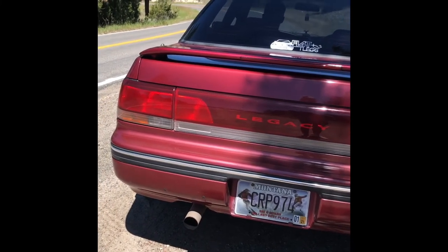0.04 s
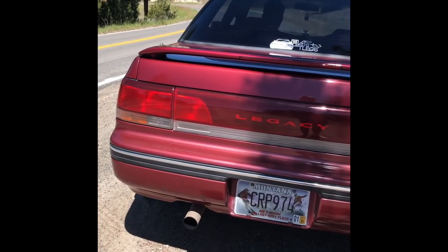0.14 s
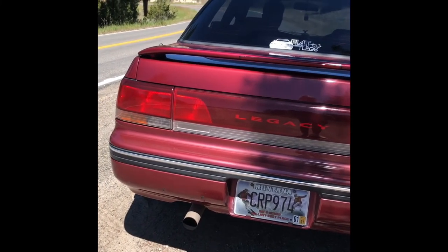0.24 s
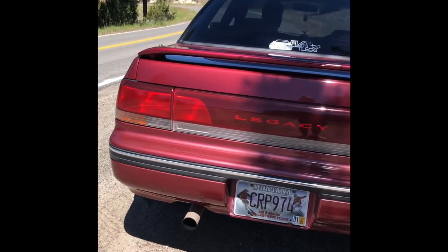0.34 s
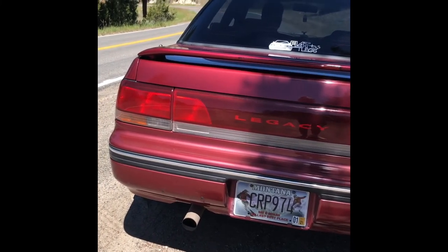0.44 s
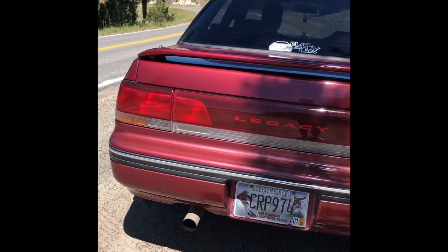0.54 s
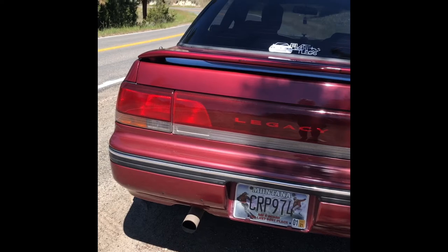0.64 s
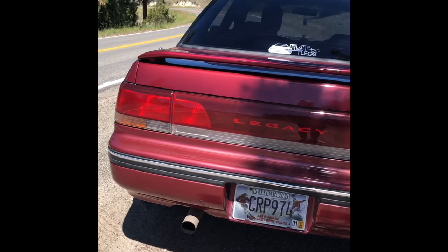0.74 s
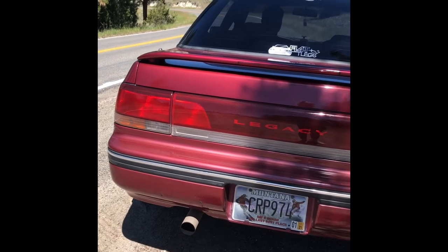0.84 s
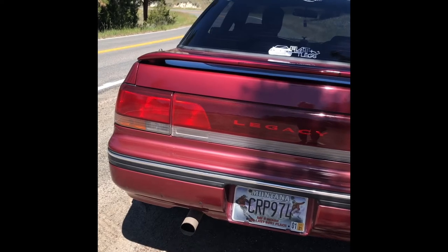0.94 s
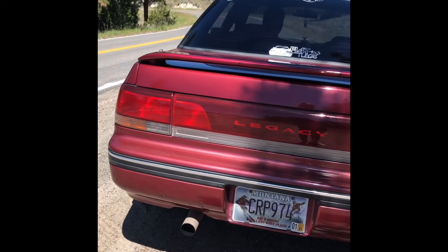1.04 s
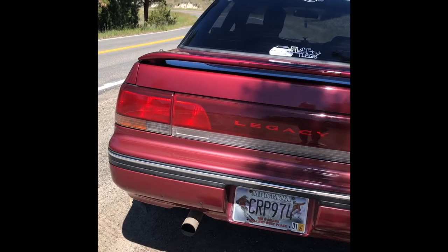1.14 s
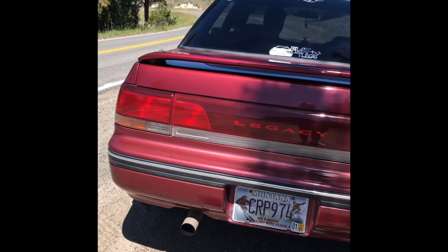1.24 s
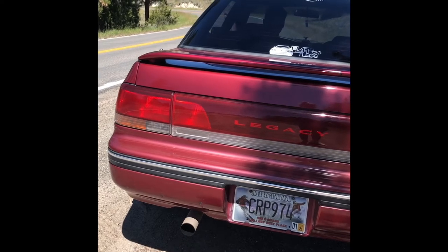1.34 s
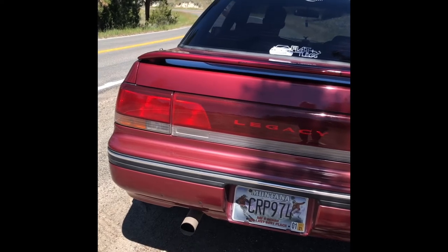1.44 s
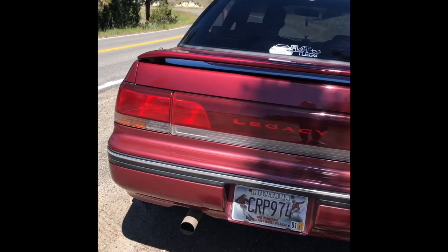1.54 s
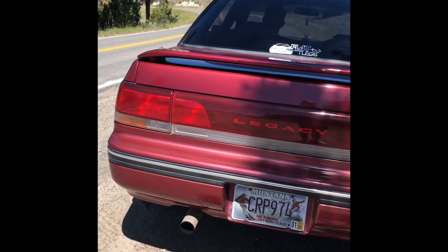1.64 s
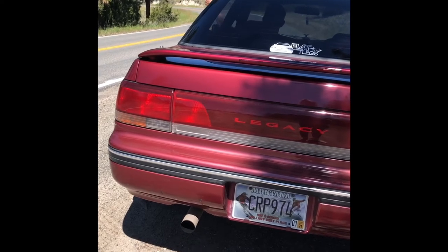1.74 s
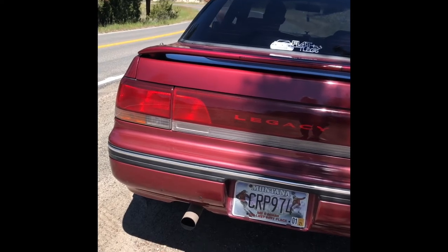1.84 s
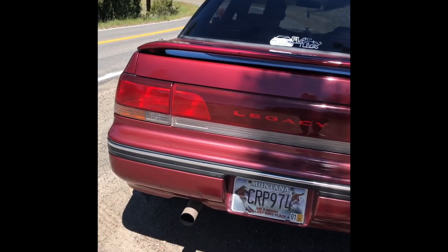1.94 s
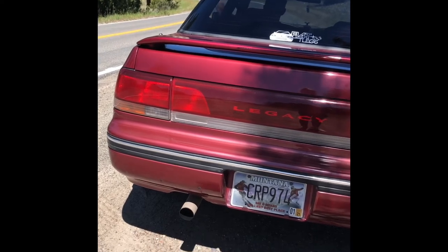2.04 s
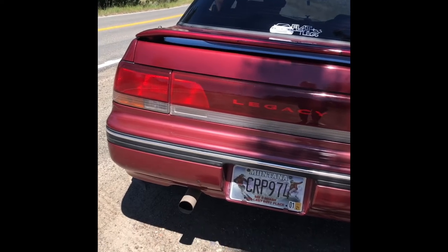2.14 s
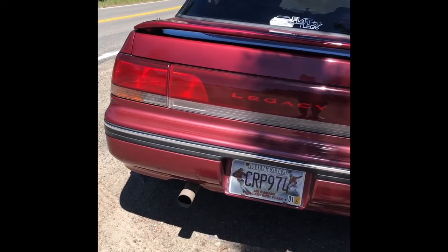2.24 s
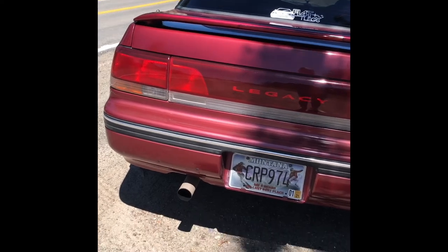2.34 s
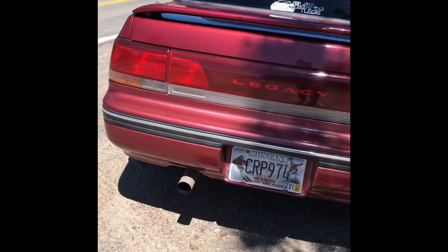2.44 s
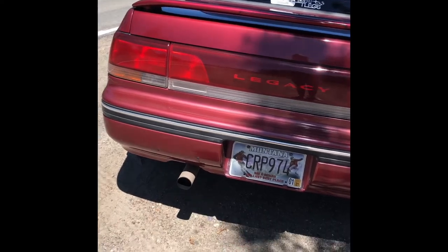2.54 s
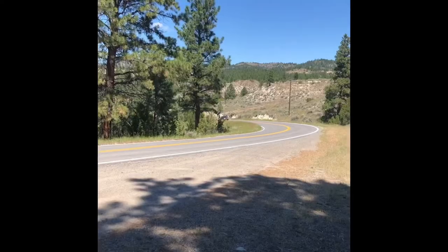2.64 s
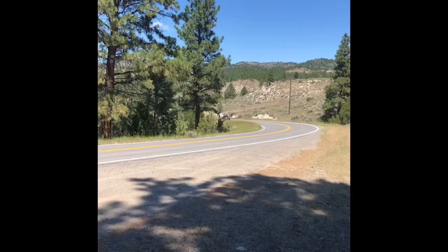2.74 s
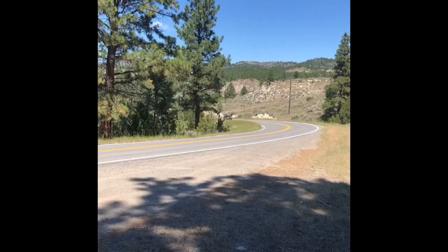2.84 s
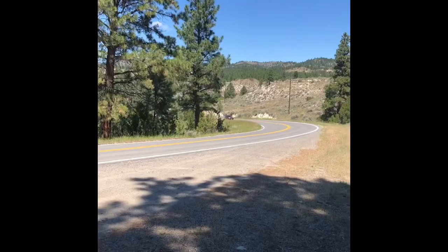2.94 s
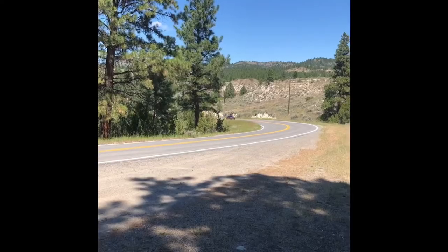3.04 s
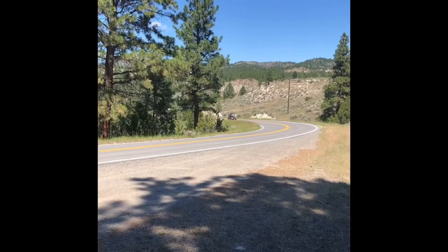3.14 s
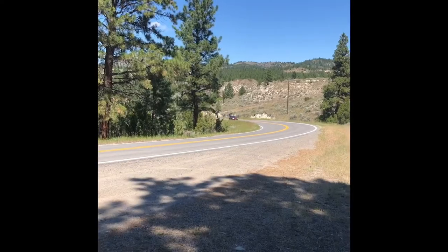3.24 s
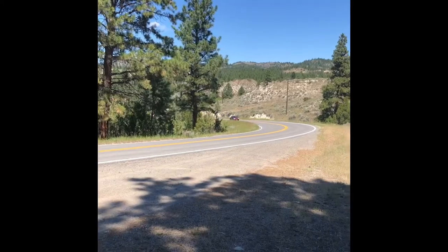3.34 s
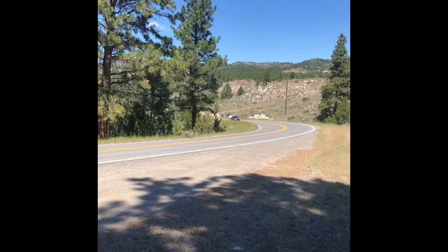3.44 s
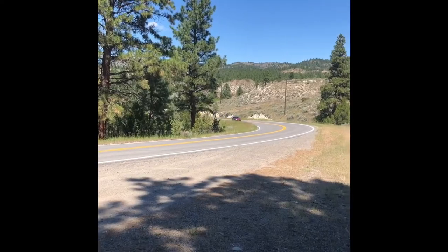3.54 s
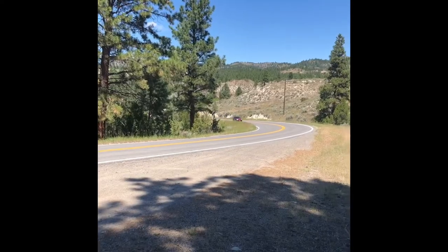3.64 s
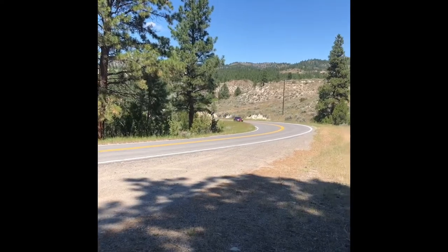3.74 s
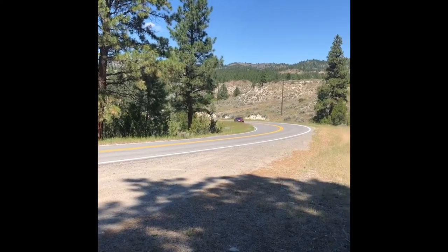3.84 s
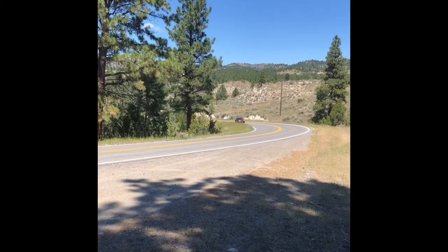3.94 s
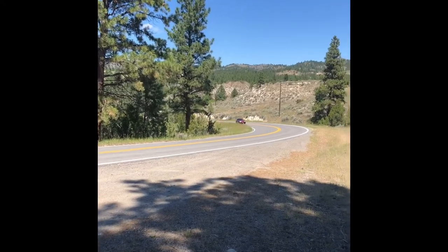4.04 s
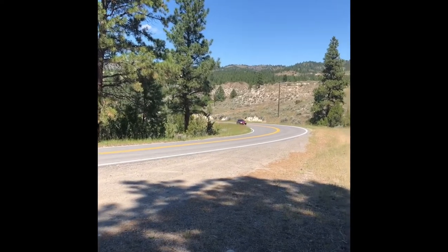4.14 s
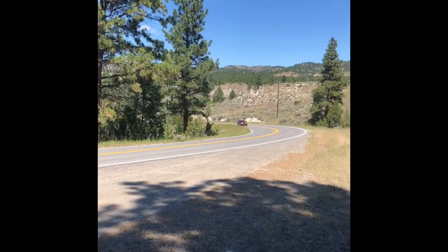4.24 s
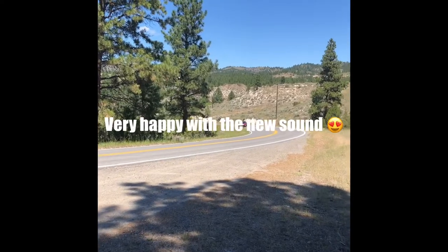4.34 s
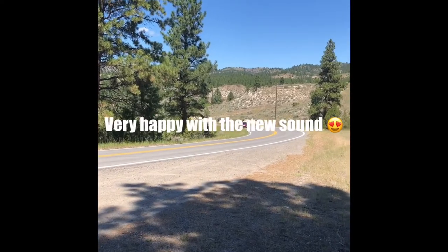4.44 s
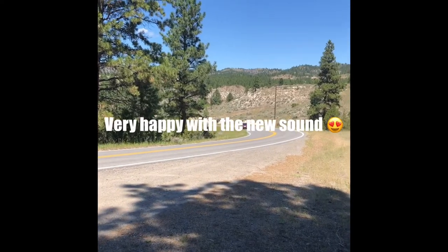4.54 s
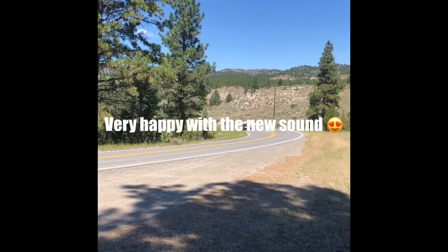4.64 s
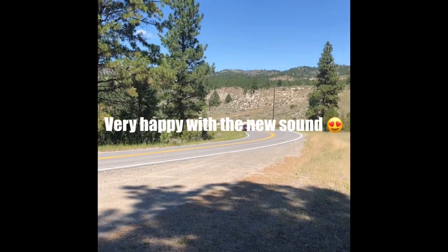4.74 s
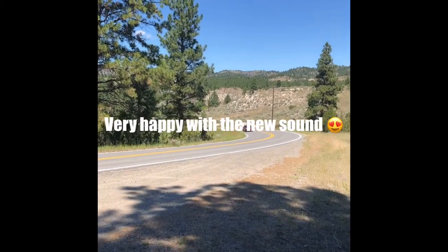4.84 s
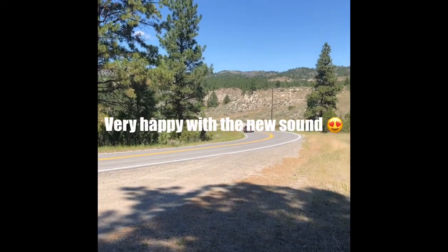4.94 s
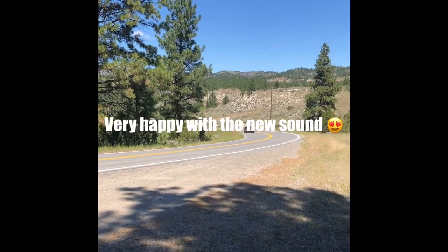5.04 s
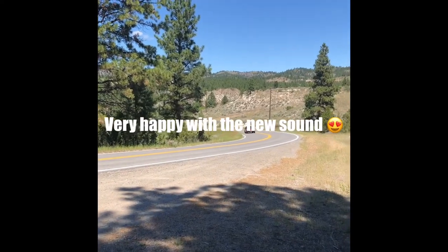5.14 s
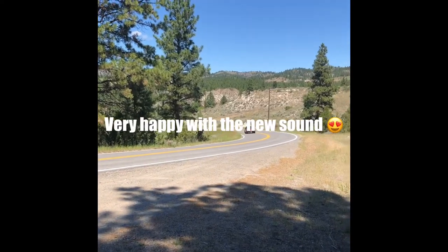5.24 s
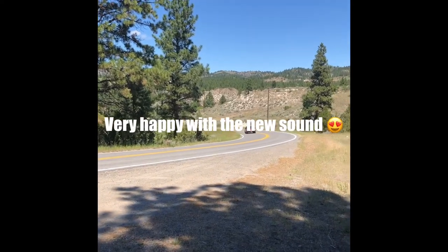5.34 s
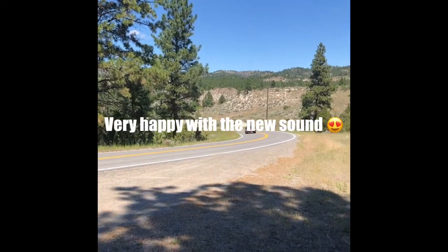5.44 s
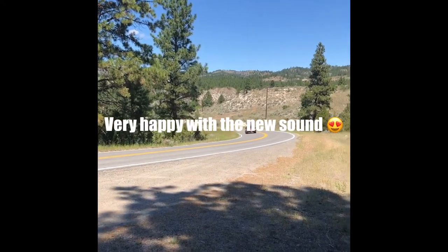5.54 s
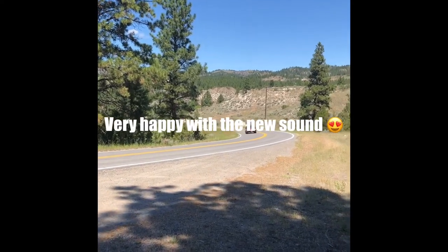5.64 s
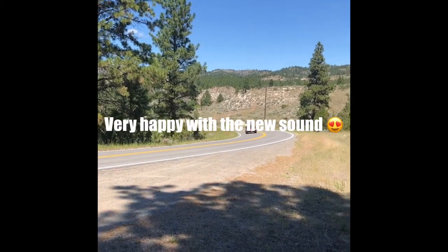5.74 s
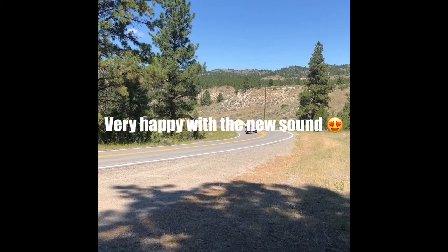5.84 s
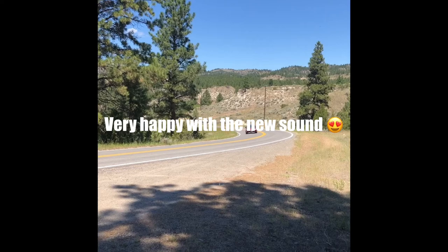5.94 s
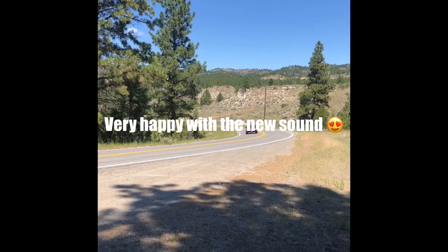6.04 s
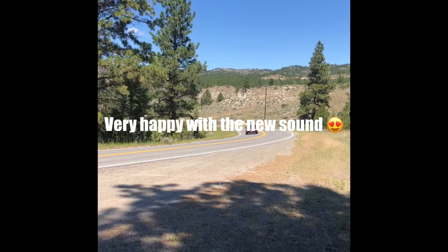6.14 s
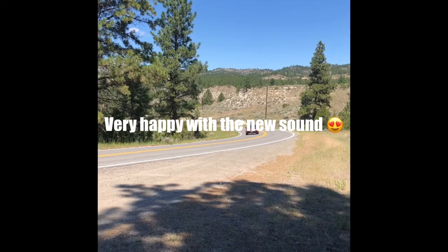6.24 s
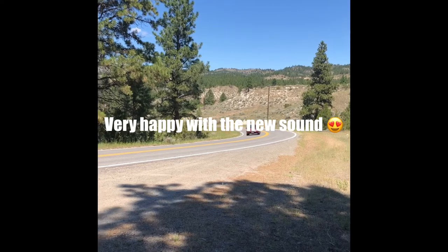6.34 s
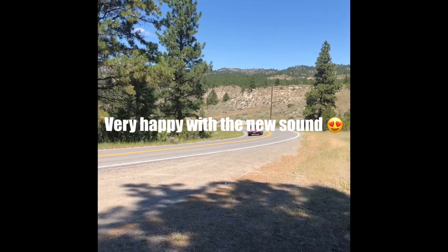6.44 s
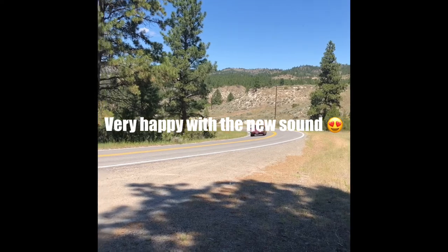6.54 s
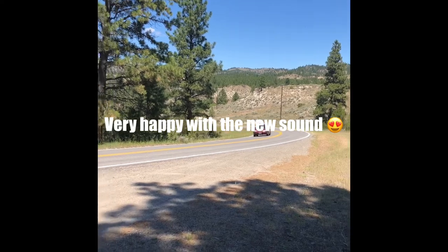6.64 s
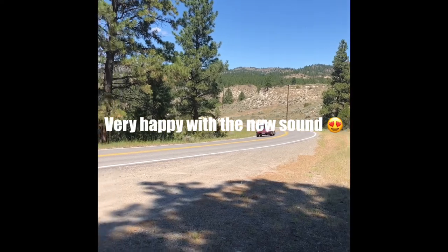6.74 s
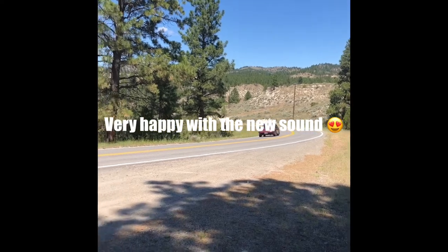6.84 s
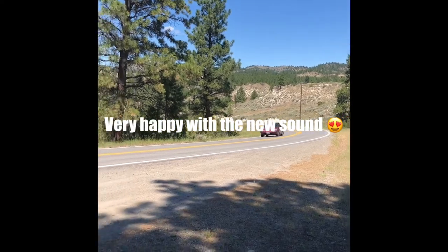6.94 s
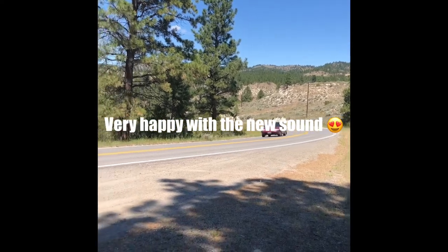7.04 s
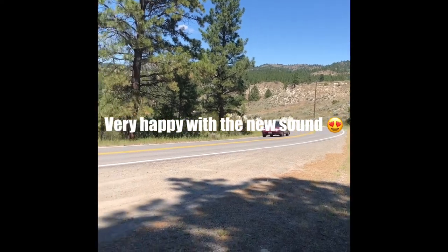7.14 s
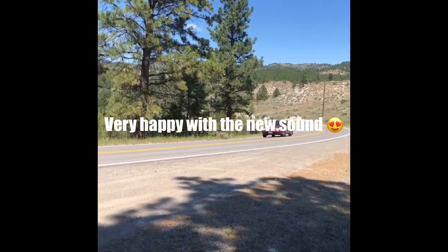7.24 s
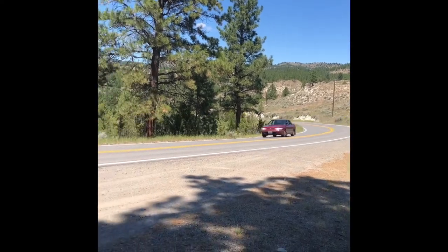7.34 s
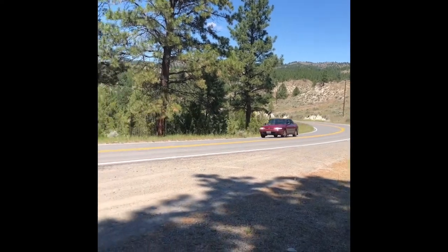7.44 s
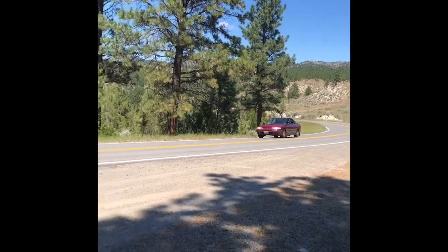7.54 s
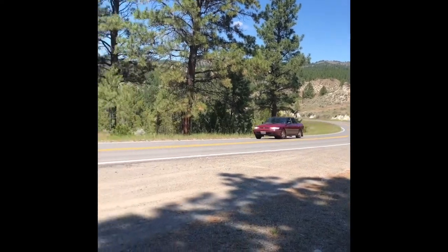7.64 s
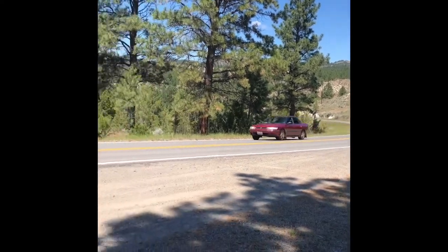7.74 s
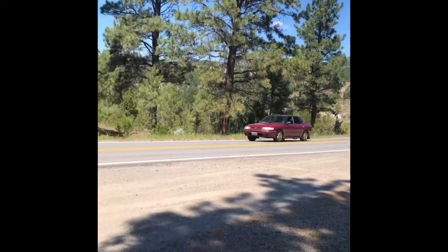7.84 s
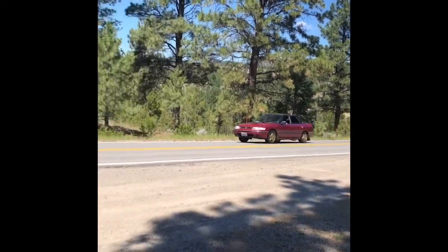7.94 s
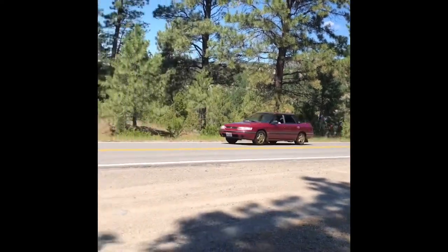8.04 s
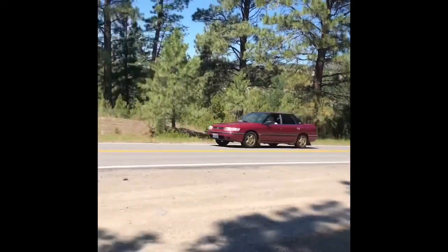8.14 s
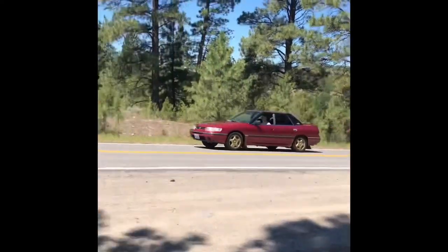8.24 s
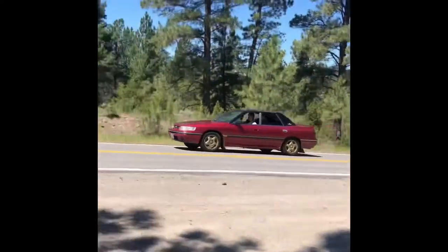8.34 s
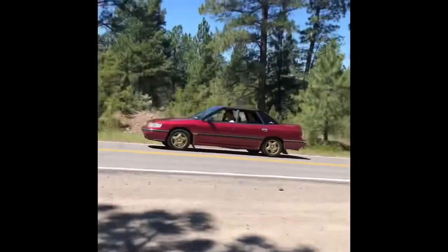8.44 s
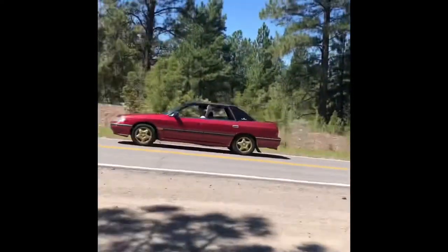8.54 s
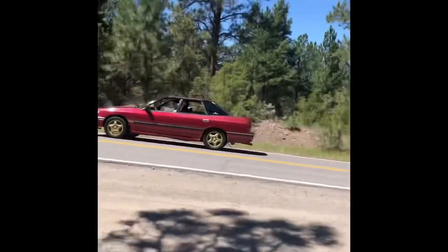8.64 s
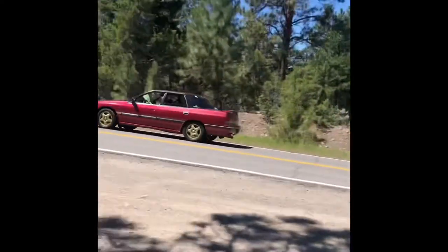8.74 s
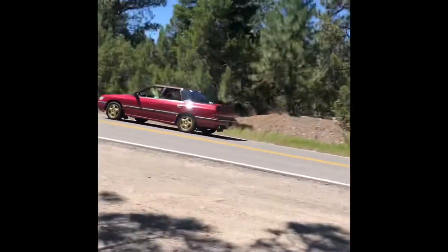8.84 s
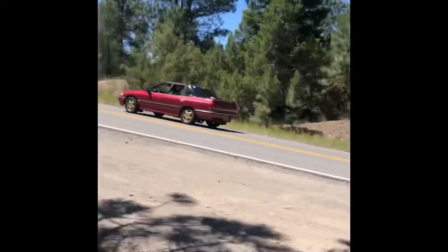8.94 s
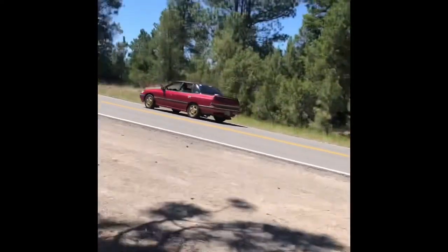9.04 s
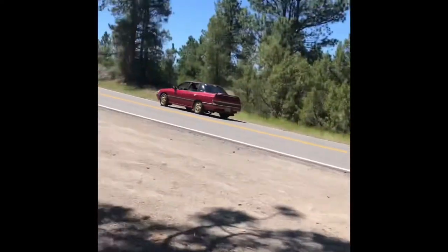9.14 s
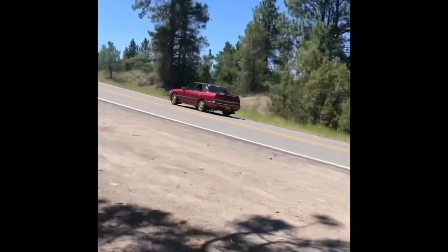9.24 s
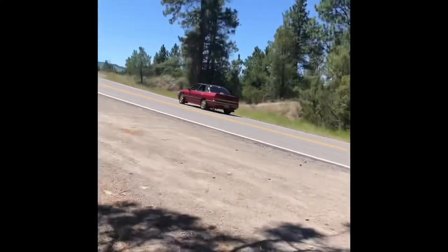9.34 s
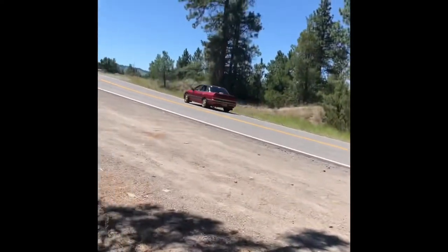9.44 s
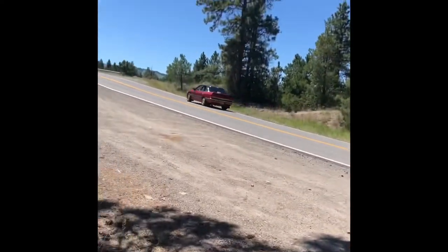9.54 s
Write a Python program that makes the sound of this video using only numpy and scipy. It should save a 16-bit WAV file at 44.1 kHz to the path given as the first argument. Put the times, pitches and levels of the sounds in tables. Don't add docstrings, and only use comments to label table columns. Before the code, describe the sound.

Close behind a tailpipe, a rumbling uneven engine sags, bangs sharply and revs; then a cut to a quiet road where the car approaches and passes.

```python
import sys
import numpy as np
from scipy import signal
from scipy.fft import rfft, irfft, next_fast_len
from scipy.io import wavfile
from scipy.ndimage import uniform_filter1d

SR = 44100
rng = np.random.default_rng(int(sys.argv[2]) if len(sys.argv) > 2 else 0)


def generate_wav(sig):
    pcm = np.round(np.clip(np.atleast_2d(sig).T, -1, 1) * 32767).astype(np.int16)
    wavfile.write(sys.argv[1], SR, pcm)


def amplitude_ratio(level_db):
    exponent = np.asarray(level_db, float) / 20
    return 10 ** exponent


N = 422919
TIME = np.arange(N) / SR
CUT_S, FADE_S = 2.53, 0.034

# (time [s], speed [cycles/s])
PARKED_SPEED = [(0, 32.8), (.63, 25), (.74, 25.4), (.86, 24.5), (1.355, 19.1), (1.46, 23.7), (1.74, 37.7),
                (1.79, 38.4), (2.0, 36.1), (2.53, 29.3)]
DRIVING_SPEED = [(2.56, 36.2), (3.69, 41.03), (3.85, 39.35), (4.03, 37.8), (4.16, 32), (4.3, 29.07),
                 (4.54, 29.13), (5.75, 31.75), (6.73, 33.62), (7.36, 35), (7.85, 35.65), (8.3, 35.6),
                 (8.87, 33.88), (9.15, 33.35), (9.45, 33.17), (9.59, 33.5)]
# (time [s], effort [dB])
PARKED_EFFORT = [(0, -29.5), (.16, -29.5), (.35, -25.5), (.64, -36.5), (.77, -33), (.87, -39), (1.13, -36),
                 (1.355, -39.5), (1.46, -29.5), (1.74, -23.5), (1.79, -28), (1.9, -28.5), (1.99, -22),
                 (2.05, -25), (2.3, -29), (2.53, -26)]
# (time [s], level [dB])
DRIVING_DRONE = [(2.56, -52.5), (3.69, -48.5), (3.88, -50), (4.15, -49.5), (4.3, -49), (4.54, -47),
                 (5.12, -46), (6.0, -41.5), (6.73, -37.5), (7.36, -32), (7.85, -25), (8.1, -20.5),
                 (8.24, -20.5), (8.47, -16.5), (8.87, -15), (9.15, -15), (9.59, -20.5)]

COASTING = [-9.5, -2.5, 0, -19.5, -7.5, -15.5, -12, -24, -19.5, -15.5, -27, -26.5, -30.5, -14.5, -24.5, -29,
            -19.5, -20, -11.5, -29]
COASTING_SLOW = [-21, 0.5, -11.5, -11, -2, -10, -9, -37, -15, -14.5, -14.5, -22, -20.5, -31, -25, -42,
                 -26.5, -29.5, -27.5, -28]
THROTTLE = [-6.5, -5, 1.5, -5, -2, -1, -7, -5, -17.5, -17, -18.5, -24, -13, -14.5, -20.5, -17.5, -14, -32,
            -12, -24]
LOW_GEAR = [-21.5, -3.5, 0.5, -31, -12.5, -6, -7, -28, -33, -27, -23, -32, -16.5, -32, -16, -27, -31, -34,
            -37, -38]
SHIFTING = [0, 2.5, 1.5, -12, -8, -3.5, -20, -31, -15, -28, -27, -19, -21, -13, -24, -34, -35, -28, -41,
            -41]
HIGH_GEAR = [-21, 0.5, -3, -13.5, -6, 0, -13.5, -8, -1, -4.5, -11.5, -15, -15, -26, -39, -21, -11, -22, -14,
             -12]
NEARING = [-25, -10, 4, -12, -2, -9, -1, -12, 1, -16, -12, -36, -25.5, -29, -12.5, -11, -14, -28, -20, -26]
ABREAST = [-15, -6, 3.5, -38, -10, -2, -1, -36, -9.5, -18, -13, -30, -19, -28, -5, -20, -22, -18, -35, -38]
PASSING = [-15.5, -4.5, -1, -40, -13.5, 0, 0, -54, -9, -13.5, -7, -26, -7, -44, 0.5, -12, -7.5, -18, -9,
           -19]
# (start [s], end [s], set of levels [dB])
PARKED_LOADS = [
    (0, 0.547, COASTING),
    (0.895, 1.349, COASTING_SLOW),
    (1.429, 1.745, THROTTLE),
    (1.81, 2.5, COASTING),
]
ROAD_LOADS = [
    (2.5, 3.64, LOW_GEAR),
    (3.72, 4.078, SHIFTING),
    (4.267, 6.0, HIGH_GEAR),
    (6.913, 7.27, NEARING),
    (7.688, 8.28, ABREAST),
    (8.59, 9.596, PASSING),
]

# (place [share of cycle], drone [dB], front [dB])
PARKED_FIRING = [(0, 0, 0), (.263, -5, -3.5), (.455, -4, -5), (.68, -9, -8)]
DRIVING_FIRING = [(0, 0, 0), (.23, 0, -4), (.467, -3, -10), (.76, -3, -9)]
PARKED_MARKS_S = [.283, .462, .657, .7765, .79, .872, 1.135, 1.33, 1.377, 1.498, 1.603, 1.774, 1.787,
                  2.061, 2.39]
DRIVING_MARKS_S = [8.587, 8.791, 9.028, 9.239, 9.537]
# (start [s], end [s])
FUEL_CUTS = [
    (.66, 0.85),
    (1.769, 1.88),
]
# (time [s], loss [dB], length [s])
MISFIRES = [(0.751, 7.5, .02), (0.823, 8.5, 0.018), (1.331, 2, 0.036), (1.782, 4.5, 0.023)]
# (time [s], peak [dB], thump over peak [dB])
AFTERFIRE = [
    (0.682, -5.5, -6.5),
    (0.717, -28.5, -10),
    (0.787, -38, 5),
    (0.802, -53, 35.5),
    (1.792, -15.5, 1),
    (1.834, -17.5, -2),
    (1.975, -15, -11),
    (2.021, -8.5, -6),
]

# (frequency [Hz], width [Hz], level [dB])
PIPE_MODES = [(150, 140, -6), (275, 100, 1)]
# (frequency [Hz], level [dB])
PIPE_RESPONSE = [(40, -12), (75, -1.5), (400, -1.5), (440, -16), (480, 1), (520, -6.5), (700, -53)]
# (frequency [Hz], density [dB per Hz])
BANG_COLOUR = [(300, -27), (600, 8.5), (900, 7.5), (1400, -7), (2200, -8), (3500, -17), (8000, -37),
               (15500, -56)]
PARKED_COLOUR = [(260, -36), (450, -25.5), (530, 11.5), (723, -4), (851, -4.5), (1160, -15), (1250, -3.5),
                 (1520, -17), (1860, -18.5), (2190, -18.5), (2400, -26.5), (3040, -27), (3370, -27.5),
                 (3910, -26.5), (15500, -40)]
DRIVING_COLOUR = [(420, -6), (720, -7), (768, -4), (829, -4.5), (1400, -10.5), (1820, -17), (4760, -18),
                  (6310, -21), (15500, -34)]
FLOW_COLOUR = [(18, -58.5), (30, -20), (134, -10), (252, 1), (298, -0.5), (361, -9.5), (481, -2.5),
               (800, -5), (1040, -55.5), (1760, -120)]
SWEEP_TURNS, SWEEP_START = 1.3, -.2

# (level at -30 dB [dB], slope [dB/dB], open throttle [dB])
PARKED_DRONE = (-16.5, 0.29, -0.11)
PARKED_LAYERS = [(-30, 1.08, .1), (-51, 0.72, 6.7), (-67, .45, 3.5), (-75.5, 0.53, 17)]
THROTTLE_OPEN_S, THROTTLE_SHUT_S, THROTTLE_MOVE_S, THROTTLE_FIRST_SHARE = 1.36, 1.765, 0.025, .62
JET_COASTING, JET_THROTTLE, JET_FUEL_CUT = 0.31, 0.4, 0.21
SPIT_DB = [.1, 16, 20, 28]
SPIT_S, SPIT_LENGTH_S = .725, 0.0089

# (level at -30 dB drone [dB], slope [dB/dB], abreast [dB])
DRIVING_LAYERS = [(-50.5, 1.05, 5.5), (-45.5, 0.83, 7.5), (-60, 1.19, 7.5), (-71, 1.41, 10.5),
                  (-75, 1.49, 10.5)]
ABREAST_S = [9.02, 8.78, 8.97, 8.89, 8.88]
NEARING_S, LEAVING_S = 0.31, 0.14
FRONT_WHEELS_S, FRONT_WHEELS_LENGTH_S, FRONT_WHEELS_SHARE = 8.32, 0.054, .3
PULSES_LOW_GEAR, PULSES_HIGH_GEAR, PULSES_ABREAST = 0.1, 0.04, .2
GEAR_HOME_S, PULSES_ABREAST_S = 5.2, 8.75

# (time from the phrase's peak [s], pitch [Hz], level [dB])
TOP_NOTE = [(-.065, 6800, -24), (-.045, 7500, -25), (-.03, 7200, -20), (-.02, 7100, -26)]
PIP = [(-.08, 4400, -12), (-.072, 4350, -10), (-.064, 4200, -12)]
LEAD_IN = [(-.05, 3800, -8), (-.04, 4700, -8), (-.033, 5300, -2), (-.02, 4700, -1)]
HOOK = [(-.017, 3650, 0), (-.005, 4220, 3), (0, 4870, 9), (.014, 4170, 6), (.03, 4100, 0), (.045, 3850, -2)]
FALL = [(.012, 6250, -16), (.03, 5880, -8), (.07, 5250, -3.5), (.1, 4650, -8), (.125, 3800, 2),
        (.15, 3100, -14)]
FLAT = [(-.055, 5600, -12), (-.04, 5800, -12), (-.025, 5700, -7)]
WIDE_HOOK = [(-.032, 4000, -1), (-.012, 3850, 1), (-.004, 4400, -1), (.003, 4750, 1), (.012, 4250, 2),
             (.025, 3950, -1), (.04, 3800, -2)]
STEEP_FALL = [(.035, 6330, -6), (.065, 5760, -9), (.095, 4700, -2), (.125, 3900, -5), (.15, 3400, -7)]
BUSY, PLAIN = [TOP_NOTE, PIP, LEAD_IN, HOOK, FALL], [PIP, FLAT, WIDE_HOOK, STEEP_FALL]
# (time [s], level [dB], notes)
SONG = [
    (4.05, -62, BUSY),
    (4.44, -70, PLAIN),
    (5.275, -72, PLAIN),
    (6.054, -62, PLAIN),
    (6.465, -70, PLAIN),
]
# (delay [s], level [dB])
TRUNK_ECHOES = [(.005, -7), (.012, -14), (.024, -20), (.041, -22)]

# (frequency [Hz], density [dB per Hz])
BREEZE_COLOUR = [(20, -27), (60, -1), (200, 6.5), (500, -7.5), (1500, -25), (3000, -21), (7000, -40.5),
                 (15500, -47.5)]
BREEZE_DB, WIND_DB, WIND_LUMPS_DB, WIND_RISES_S = -57, -58.5, -1.5, 3.2
# (time [s], rise over the breeze [dB], length [s])
GUSTS = [
    (5.55, 5, .1),
    (6.595, 3, 0.089),
    (8.3, 15, .3),
    (8.732, 24, 0.11),
    (9.122, 14, .1),
]


def parked_car():
    (per_s,), (effort_db,) = in_time(PARKED_SPEED), in_time(PARKED_EFFORT)
    throttle = step(THROTTLE_OPEN_S, THROTTLE_MOVE_S) - step(THROTTLE_SHUT_S, THROTTLE_MOVE_S / 3)
    throttle *= np.interp(TIME, [THROTTLE_OPEN_S, THROTTLE_SHUT_S], [THROTTLE_FIRST_SHARE, 1])
    missed_db = sum(loss_db * bump(s, length_s) for s, loss_db, length_s in MISFIRES)
    drone_db = following(effort_db, throttle, PARKED_DRONE) - missed_db
    spit = bump(SPIT_S, SPIT_LENGTH_S)
    upper_db = [following(effort_db, throttle, layer) - missed_db + spit_db * spit
                for layer, spit_db in zip(PARKED_LAYERS, SPIT_DB)]
    cycle = cycles(per_s, PARKED_MARKS_S)

    low = drone(per_s, cycle, PARKED_LOADS, PARKED_FIRING, wobble_db=1.5, stumble_db=3.0)
    low += .13 * pipe_turbulence()

    gas = gas_pulses(cycle, PARKED_FIRING, scatter_db=.8, puff_ms=3., puff_db=-16)
    gas = coloured(gas, [(1500, 0), (4000, -4), (12000, -7)])
    flow = JET_COASTING + JET_THROTTLE * throttle + JET_FUEL_CUT * unsteadiness()
    gas += np.clip(flow, .25, 1.5) * pipe_jet()
    ground_delay = round(SR / 945.)
    gas += amplitude_ratio(-5) * np.roll(coloured(gas, [(5000, 0), (8000, -20)]), ground_delay)
    gas = coloured(gas, PARKED_COLOUR, swept=True)
    upper = in_bands(gas, [480, 2400, 6500, 10500, 17000], upper_db)
    return amplitude_ratio(drone_db) * coloured(low, PIPE_RESPONSE) + upper + afterfire()


def driving_car():
    (per_s,), (drone_db,) = in_time(DRIVING_SPEED), in_time(DRIVING_DRONE)
    front = FRONT_WHEELS_SHARE * bump(FRONT_WHEELS_S, FRONT_WHEELS_LENGTH_S)
    abreast = []
    for s in ABREAST_S:
        length_s = np.where(TIME < s, NEARING_S, LEAVING_S)
        abreast.append(1 / (1 + ((TIME - s) / length_s) ** 2) + front)
    upper_db = [following(drone_db, near, layer) for near, layer in zip(abreast, DRIVING_LAYERS)]
    cycle = cycles(per_s, DRIVING_MARKS_S)

    low = drone(per_s, cycle, ROAD_LOADS, DRIVING_FIRING, wobble_db=1.5, stumble_db=3.0)
    low += amplitude_ratio(-12 - 5 * abreast[0]) * pipe_turbulence()

    share = PULSES_LOW_GEAR + (PULSES_HIGH_GEAR - PULSES_LOW_GEAR) * step(GEAR_HOME_S, .3)
    share += PULSES_ABREAST * bump(PULSES_ABREAST_S, 0.23)
    facing = np.clip(share + np.interp(TIME, [7.3, 8.7], [.05, .55]), 0, .85)
    gas = gas_pulses(cycle, DRIVING_FIRING, scatter_db=1.2, puff_ms=2.5, puff_db=-22)
    silencer = [(700, 5), (1500, 1), (3000, -4), (6000, -12), (12000, -18)]
    pulsed = coloured(np.sqrt(facing) * gas, silencer, swept=True)
    upper = coloured(pulsed + np.sqrt(1 - facing) * tyre_roar(), DRIVING_COLOUR)
    return amplitude_ratio(drone_db) * low + in_bands(upper, [740, 960, 2400, 6500, 10500, 17000], upper_db)


def drone(per_s, cycle, loads, firing, wobble_db, stumble_db):
    place, strength_db, _ = np.transpose(firing)
    moments = [s for start, end, _ in loads for s in (start, end)]
    slow, fast = drift(2.38, count=22), drift(27.0, count=22)
    stumble = unsteadiness()[::64] + .07
    count = len(stumble)
    out = 0
    for k in range(3, 23):
        held_db = [table[k - 3] for *_, table in loads for _ in range(2)]
        level_db = np.interp(TIME[::64], moments, held_db)
        level_db += wobble_db * slow[k - 1, :count] + stumble_db * stumble * fast[k - 1, :count]
        lined_up = np.angle(np.sum(amplitude_ratio(strength_db) * np.exp(-2j * np.pi * k * place)))
        lag = sweep(k * per_s[::64]) + .14 * stumble * fast[-k, :count]
        phase = 2 * np.pi * (k * cycle - per_sample(lag)) + lined_up
        out = out + per_sample(amplitude_ratio(level_db)) * np.cos(phase)
    return evened(out)


def gas_pulses(cycle, firing, scatter_db, puff_ms, puff_db):
    fronts = np.zeros(N)
    for place, _, front_db in firing:
        at = np.flatnonzero(np.diff(np.floor(cycle - place)) > 0)
        scatter = scatter_db * rng.standard_normal(N // 500)[:len(at)]
        scatter = scatter - 6 * unsteadiness()[at]
        fronts[at] = amplitude_ratio(front_db + scatter)
    decay = np.exp(-1000 / (puff_ms * SR))
    puffs = signal.lfilter([1], [1, -decay], fronts) * rng.standard_normal(N)
    puffs = signal.sosfilt(signal.butter(2, 1500, "high", fs=SR, output="sos"), puffs)
    return evened(fronts + amplitude_ratio(puff_db) * puffs)


def afterfire():
    s, peak_db, thump_db = np.transpose(AFTERFIRE)
    at = (s * SR).astype(int)
    crack, thump = np.zeros(N), np.zeros(N)
    crack[at] = amplitude_ratio(peak_db)
    thump[at] = amplitude_ratio(peak_db + thump_db)
    hiss = signal.lfilter([1], [1, -np.exp(-1 / (.0025 * SR))], crack + 1e-18) * rng.standard_normal(N)
    out = amplitude_ratio(4.5) * coloured(hiss + 5 * crack, BANG_COLOUR, swept=True)
    for hz, width_hz, level_db in PIPE_MODES:
        r, w = np.exp(-np.pi * width_hz / SR), 2 * np.pi * hz / SR
        boom = signal.lfilter([0, np.sin(w)], [1, -2 * r * np.cos(w), r * r], thump + 1e-18)
        out += amplitude_ratio(level_db + 2) * boom
    return out


def pipe_turbulence():
    return evened(coloured(rng.standard_normal(N), FLOW_COLOUR))


def pipe_jet():
    return coloured(rng.standard_normal(N), [(600, -10), (1300, -6), (2500, 0), (12000, 0)])


def tyre_roar():
    tread = coloured(rng.standard_normal(N), [(900, -3), (1700, 3), (3000, 0)])
    return tread * amplitude_ratio(1.33 * per_sample(drift(11.3, count=1)[0]))


def cycles(per_s, marks_s):
    count = np.cumsum(per_s) / SR
    slip = np.unwrap(np.interp(marks_s, TIME, count) % 1, period=1)
    return count - np.interp(TIME, marks_s, slip)


def unsteadiness():
    inside = sum((TIME > start) & (TIME < end) for start, end in FUEL_CUTS)
    return uniform_filter1d(inside * 1., SR // 50)


def sweep(hz):
    return SWEEP_TURNS * np.log(hz / 1000) - SWEEP_START


def bird():
    out = np.zeros(N)
    for start_s, level_db, notes in SONG:
        for note in notes:
            s, hz, shape_db = np.transpose(note)
            t = np.arange(s[0], s[-1], 1 / SR)
            pitch = np.interp(t, s, hz) * (1 + .012 * rng.standard_normal())
            whistle = np.sin(2 * np.pi * np.cumsum(pitch) / SR) * signal.windows.tukey(len(t), .3)
            at = int((start_s + s[0]) * SR)
            out[at:at + len(t)] += amplitude_ratio(level_db + np.interp(t, s, shape_db)) * whistle
    out *= amplitude_ratio(4.7 * per_sample(drift(45.8, count=1)[0, :N // 64 + 1]))
    return out + sum(amplitude_ratio(db) * np.roll(out, int(s * SR)) for s, db in TRUNK_ECHOES)


def open_air():
    breeze = amplitude_ratio(BREEZE_DB) * evened(coloured(rng.standard_normal(N), BREEZE_COLOUR), span_s=3.9)
    band = signal.butter(2, [30, 75], "band", fs=SR, output="sos")
    lumps = signal.sosfilt(band, rng.standard_normal(N))
    gust_db = sum(rise_db * bump(s, length_s) for s, rise_db, length_s in GUSTS)
    gust_db = gust_db + 25 * (step(WIND_RISES_S, .15) - 1)
    gust_db += WIND_LUMPS_DB * per_sample(drift(5.5, count=1)[0, :N // 64 + 1])
    return breeze + amplitude_ratio(WIND_DB + gust_db) * lumps / lumps.std()


def coloured(x, spectrum, swept=False):
    size = next_fast_len(N + 8192)
    hz = np.maximum(np.arange(size // 2 + 1) * SR / size, 10)
    points_hz, level_db = np.transpose(spectrum)
    gain = amplitude_ratio(np.interp(np.log(hz), np.log(points_hz), level_db))
    response = gain * np.exp(-2j * np.pi * swept * sweep(hz))
    return irfft(rfft(x, size) * response, size)[:N]


def in_bands(x, edges_hz, levels_db):
    out = 0
    for low, high, level_db in zip(edges_hz, edges_hz[1:], levels_db):
        band = signal.sosfiltfilt(signal.butter(2, [low, high], "band", fs=SR, output="sos"), x)
        out = out + amplitude_ratio(level_db) * evened(band)
    return out


def following(control_db, extra, layer):
    base_db, slope, extra_db = layer
    return base_db + slope * (control_db + 30) + extra_db * extra


def evened(x, span_s=.12):
    return x / np.sqrt(uniform_filter1d(x ** 2, int(span_s * SR)) + 1e-14)


def in_time(rows):
    s, *columns = np.transpose(rows)
    return [np.interp(TIME, s, column) for column in columns]


def drift(rate_hz, count):
    r = np.exp(-128 * np.pi * rate_hz / SR)
    noise = rng.standard_normal((count, N // 64 + 501))
    slow = signal.lfilter([1], [1, -2 * r, r * r], noise)[:, 500:]
    return slow / slow.std()


def per_sample(slow):
    return np.interp(np.arange(N) / 64, np.arange(len(slow)), slow)


def bump(at_s, length_s):
    return np.exp(-.5 * ((TIME - at_s) / length_s) ** 2)


def step(at_s, length_s):
    return .5 + .5 * np.tanh((TIME - at_s) / length_s)


def scene():
    first = np.clip((CUT_S - TIME) / FADE_S, 0, 1) ** 0.59
    second = np.clip((TIME - CUT_S) / FADE_S, 0, 1)
    return (first * parked_car() + second * (driving_car() + bird() + open_air()))[None]


def roll_off(x):
    return signal.sosfilt(signal.butter(12, 15720, fs=SR, output="sos"), x)


def record(dry):
    dry = signal.sosfilt(signal.butter(3, 55, "high", fs=SR, output="sos"), dry)
    mix = 0.81 * np.tanh(dry / 0.75)
    return roll_off(mix)


dry = scene()
out = record(dry)
generate_wav(out)
```